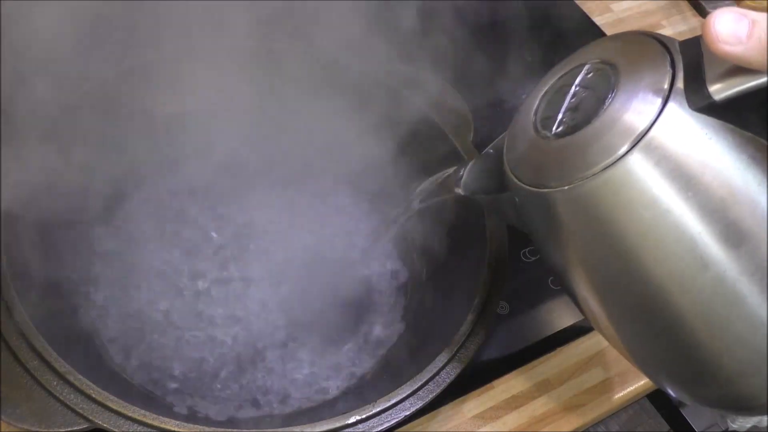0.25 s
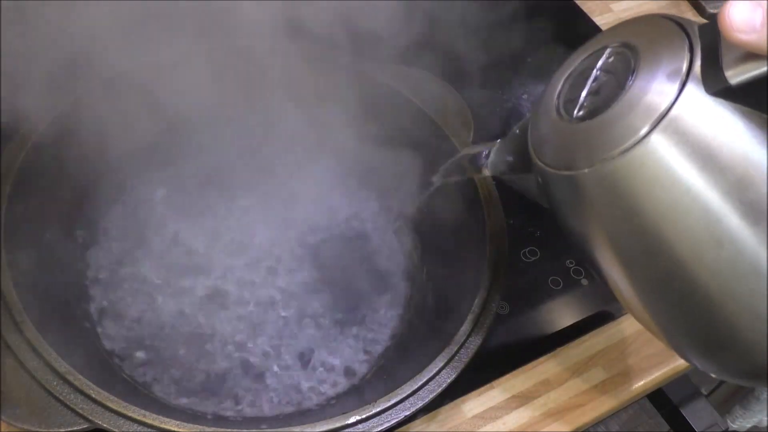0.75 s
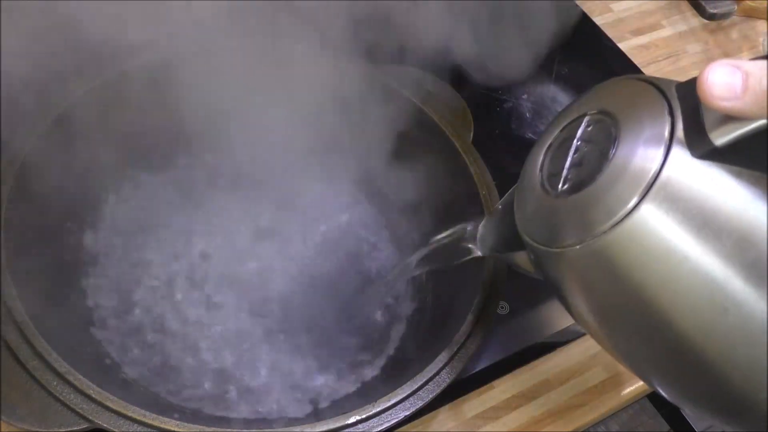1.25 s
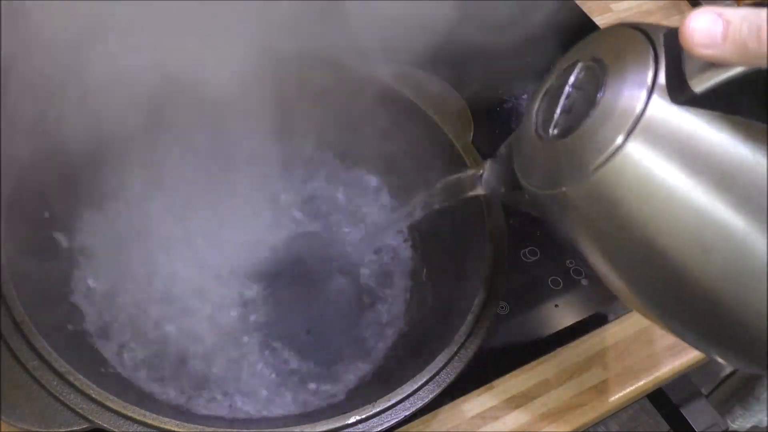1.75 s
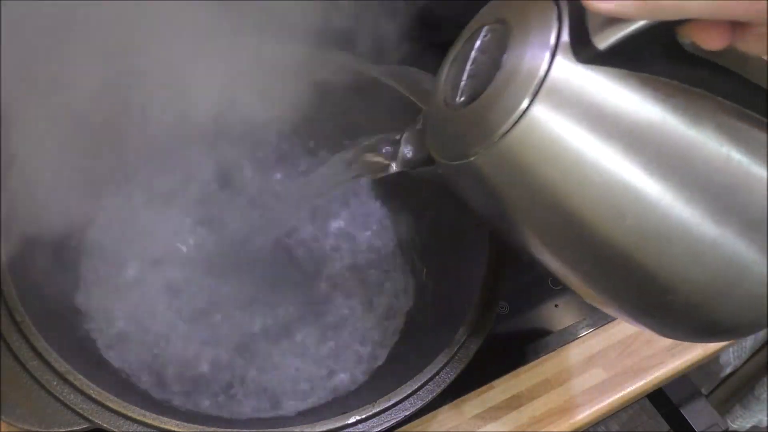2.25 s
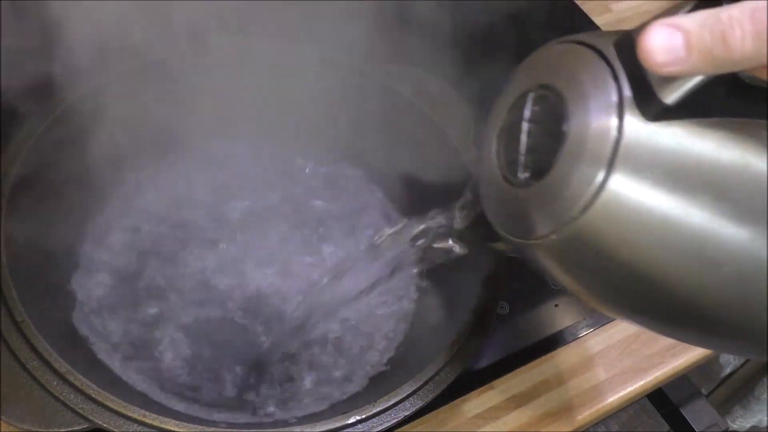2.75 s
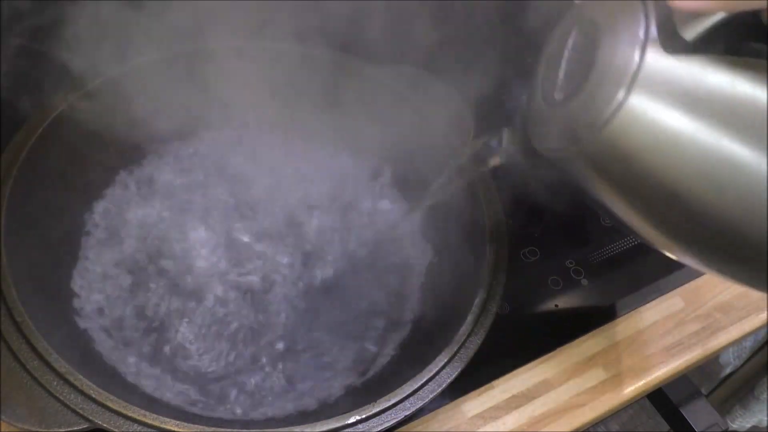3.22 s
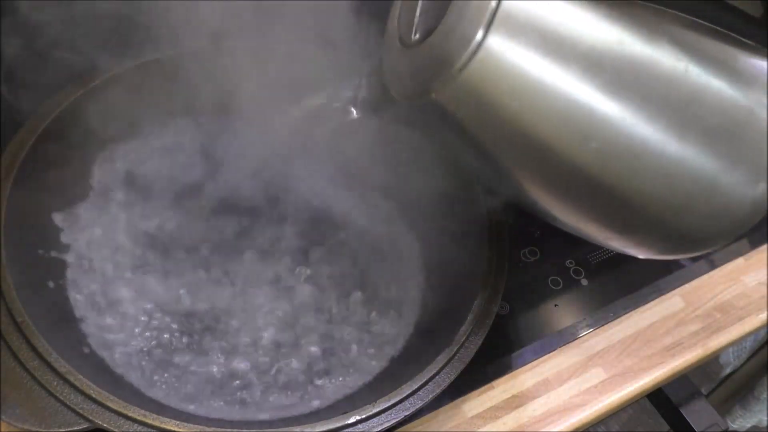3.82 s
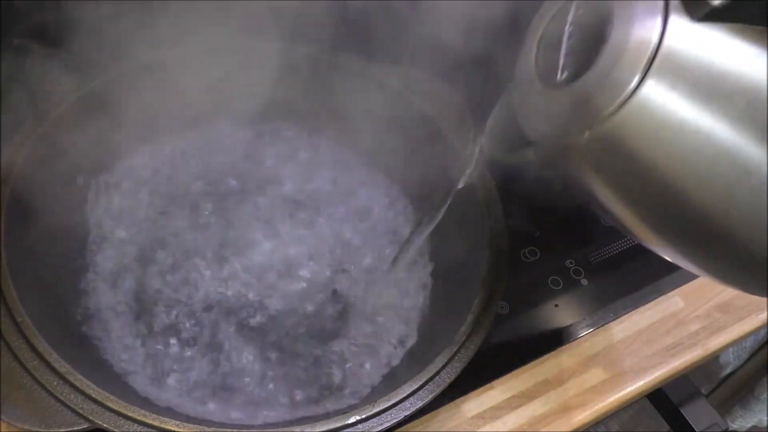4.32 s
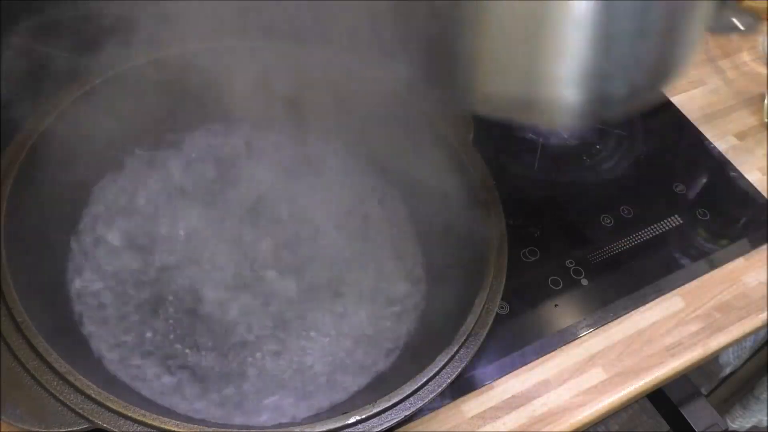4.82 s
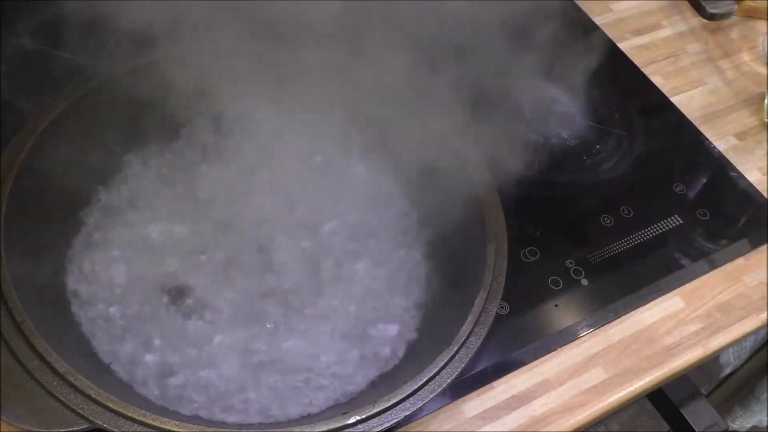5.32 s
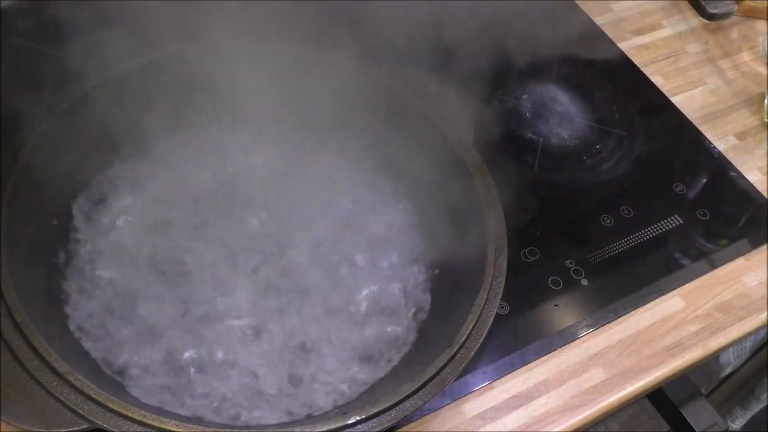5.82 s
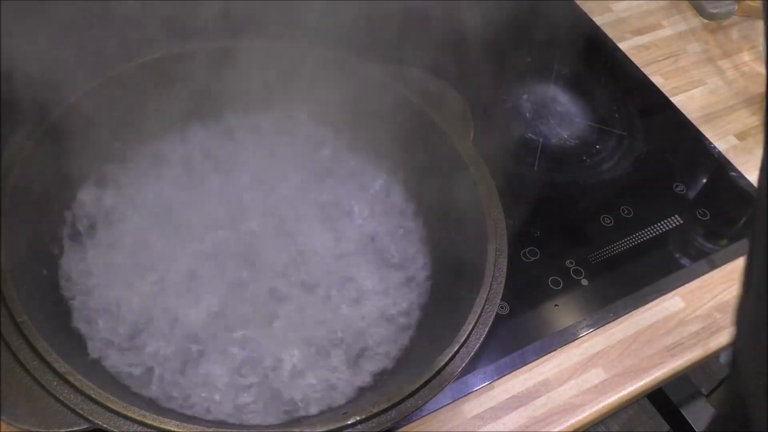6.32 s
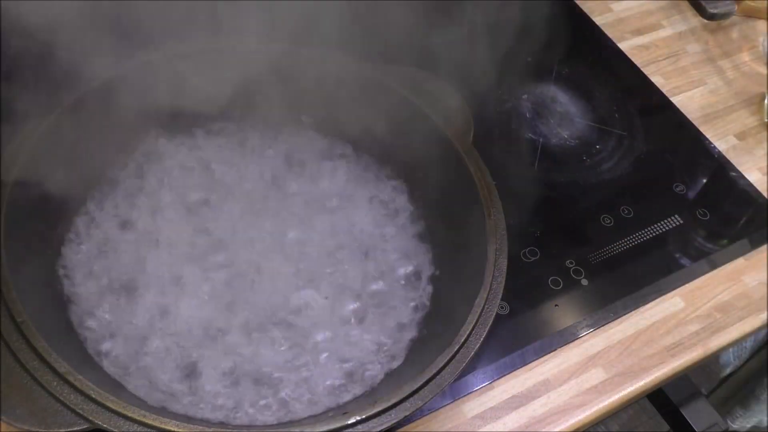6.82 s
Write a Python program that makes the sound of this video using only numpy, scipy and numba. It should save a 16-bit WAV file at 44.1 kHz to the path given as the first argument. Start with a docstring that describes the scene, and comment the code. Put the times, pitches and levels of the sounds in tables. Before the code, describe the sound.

From 0 s, water pouring into a very hot iron pan boils furiously, close to a stereo microphone in a kitchen. The sound is a dense, continuous, broadband hiss of steam, bright and somewhat thin at first, wavering slightly, with faint metallic colouring from the pan. From about 1.5 to 3 s the bubbling becomes clearer, tiny short rising blips in clumps, and the roar turns deeper and fuller as the pool fills. Small surges come around 1.8, 3 and 4 s. From 4.5 to 6 s the boil is steady, frothy and full, with a little more low rumble. At about 6.3 s the kettle is set down nearby: one knock, then a louder tight clatter at 6.38-6.45 s, dull, woody and clicky, with a short room echo. The boil drops noticeably beneath the knocks, then creeps back until the end at 7 s.

```python
"""In a kitchen, microphone near a very hot iron pan, hot water is poured in and boils hard: noise shaped per moment.
Steam hisses and bubbles burst as short rising rings, while the roar deepens with the filling pool.
Late on, the kettle is set down close by with a few knocks: dull clicks over ringing modes, with a short room echo.
Gain control ducks the boil under the knocks and lets it creep back."""
import sys
import numpy as np
from scipy import signal
from scipy.fft import rfft, irfft
from scipy.io import wavfile
from scipy.ndimage import uniform_filter1d, minimum_filter1d
from numba import njit

SR = 44100
rng = np.random.default_rng(int(sys.argv[2]) if len(sys.argv) > 2 else 0)


def master_out(mix):
    """Clip the mix to full scale and print it as 16-bit PCM to the path in sys.argv[1]."""
    frames = np.transpose(np.atleast_2d(mix))
    ceiling = np.clip(frames, -1, 1)
    pcm = np.round(ceiling * 32767).astype(np.int16)
    wavfile.write(sys.argv[1], SR, pcm)


N = 311784

# how hard the pool boils, ahead of the gain control: time_s, level_db, treble_tilt_db
BOIL_COURSE = [(0, -22.5, 1), (.15, -24, -.5), (.36, -22, -0.5), (.5, -23, .3), (.62, -23.5, -.3),
               (.72, -22.5, .6), (.95, -23.1, -1.2), (1.12, -22.5, -1.2), (1.48, -24.5, -2), (1.84, -21, 1),
               (2.05, -23.5, -1.5), (2.37, -21.9, 0), (2.68, -24, -0.5), (2.98, -20.8, -1.5),
               (3.15, -22.5, -.5), (3.68, -23.5, -0.5), (3.95, -21, -0.5), (4.27, -22, 1), (4.42, -23, 1),
               (4.7, -23.7, .2), (5.15, -23, -.2), (5.5, -22.5, 0.5), (5.65, -24, -0.7), (5.85, -22.6, 0),
               (6.6, -23, 0), (7.07, -22.5, 2)]
# depth of the pool, rising while pouring and again as it froths up: time_s, depth (0-1)
POOL_DEPTH = [(0, .05), (1.3, .2), (2.6, .62), (4.3, 0.49), (6, .97), (7.07, 0.92)]
# low rumble over its usual share: time_s, lift_db
RUMBLE_LIFT = [(0, .3), (2, -1), (2.6, -2.5), (4.8, 2.5), (6.1, -1), (6.6, 5), (7.07, -1)]
# colour of a thin film of water: pitch_hz, density_db (per Hz, relative)
SHALLOW_COLOUR = [(18, -70), (30, -39), (134, -19.5), (266, -27.5), (311, -15.5), (364, -32.5), (394, -19),
                  (584, -10), (684, -16.5), (740, -13), (1350, -4.5), (2830, -3), (11700, -7.5),
                  (16000, -15.5)]
# colour of a full pool: pitch_hz, density_db (per Hz, relative)
DEEP_COLOUR = [(18, -63), (30, -26), (149, -12), (259, -18), (303, -9.5), (426, -2.5), (780, -7.5),
               (1250, -5.5), (1350, -6), (2350, -4.5), (5590, -7), (9460, -7), (13700, -9.5),
               (16000, -19.5)]
# the iron and the air over it ring with the boil: pitch_hz, width_hz, lift_db
PAN_RINGS = [(50, 13, 2), (77.5, 30, -7), (103, 14, -1.5), (188, 30, 0.5), (211, 16, -5.5), (286, 17, -4.5),
             (314, 30, 5.5), (378, 20, -2), (439, 21, 4), (503, 14, 2.5), (608, 38, 4.5), (674, 24, -2),
             (732.4, 17, 7.5), (743, 10, 0), (789, 16, 6), (820, 12, -5), (850, 21, 4.5), (1082, 29, 2),
             (1289, 42, 4), (1334, 25, -2), (1428, 33, 3), (1660, 47, -3.5), (1805, 55, 0),
             (2870, 180, 1.5), (4950, 220, 0), (5700, 560, -1), (9330, 330, 1.5)]
# likeness of the boil's two channels: pitch_hz, likeness (0-1)
STEREO_LIKENESS = [(60, 0.76), (130, 0.85), (210, .7), (330, 0.86), (640, 0.93), (1200, 0.95), (1800, .91),
                   (3100, 0.91), (4800, .95), (6200, 1), (15000, 1)]
# level balance of the boil's channels: pitch_hz, left_minus_right_db
STEREO_LEAN = [(60, 1), (110, 5), (200, 1.5), (380, -1.5), (700, -0.5), (1290, -0.5), (2380, 1.0),
               (4400, 0.5), (6200, 0), (15000, 0)]
# phase by which the boil's left channel leads: pitch_hz, lead_rad
STEREO_LEAD = [(0, 0), (260, -0.38), (860, 0.0), (1380, 0.16), (2760, 0.08), (6200, 0), (16100, 0)]
# bursting bubbles: time_s, level_db
BUBBLE_LEVEL = [(0, -44), (.8, -41.5), (1.8, -33), (2.8, -32), (3.7, -35.3), (4.6, -36), (5.2, -33.5),
                (6, -40.5), (7.07, -37)]
# kettle base on the worktop: start_s, blow_db, most_struck_hz, click_db, click_top_hz, left_minus_right_db
KETTLE_KNOCKS = [(6.3002, 1, 330, -8, 2590, 3), (6.380, 4.5, 270, -6.5, 3000, 2),
                 (6.3992, 4, 684, -2, 3700, 4), (6.429, 0, 200, -9, 3500, 1),
                 (6.437, -4, 180, -20, 3000, 4), (6.449, -6.5, 330, -28, 2000, 1)]
# modes of worktop and kettle before each blow's small shift: pitch_hz, level_db, t60_s
WORKTOP_MODES = [(126, -8.5, 0.12), (180, -9, .1), (280, 0, 0.058), (330, -1, 0.068), (401, -0.5, 0.061),
                 (532, -2.5, 0.042), (685, -1.5, 0.044), (900, -9, .02), (1218, 1, 0.037), (1810, 1, 0.02)]
EDGE_HZ = 15950  # upper band limit
SIDES = np.array([[1], [-1]])  # left, right


def gain_of(db):
    """Decibels to an amplitude factor."""
    return 10 ** (np.asarray(db) / 20)


def evened(x):
    """Scales to rms 1."""
    return x / np.sqrt(np.mean(x ** 2) + 1e-20)


def read(points, hz):
    """Reads a spectrum table at the given frequencies, on a log pitch scale."""
    f, value = np.transpose(points)
    return np.interp(np.log(hz + 1), np.log(f + 1), value)


def follow(rows, t):
    """Reads the columns of a time table at the given times."""
    s, *columns = np.transpose(rows)
    return [np.interp(t, s, column) for column in columns]


def drift(t, low_hz, high_hz):
    """Slow chance of rms 1: sines of random phase, the slower ones stronger."""
    rates_hz = np.geomspace(low_hz, high_hz, num=30)
    return evened(sum(np.sin(2 * np.pi * (f * t + rng.random())) / np.sqrt(f) for f in rates_hz))


def boil_colour(t, hz):
    """Spectrum at each moment: the roar sinks as the pool deepens, while treble and rumble waver."""
    depth = np.clip(follow(POOL_DEPTH, t)[0], -.3, 1.3)
    colour_db = read(SHALLOW_COLOUR, hz)[:, None] * (1 - depth) + read(DEEP_COLOUR, hz)[:, None] * depth
    # treble against mids wavers by moment
    treble_tilt = np.clip(np.log2(hz / 4500 + 1e-3), -.5, .5)[:, None]
    colour_db += follow(BOIL_COURSE, t)[1] * treble_tilt
    colour_db += follow(RUMBLE_LIFT, t)[0] / (1 + (hz / 330) ** 4)[:, None]
    colour = gain_of(colour_db)
    return colour / np.sqrt((colour ** 2).mean(0))


def boil(patch_db=0.61, surge_db=0.3):
    """Countless tiny steam bursts merge to noise, coloured by the pool's depth and the pan."""
    frames, hz = N // 512 + 5, np.fft.rfftfreq(2048, 1 / SR)
    colour = boil_colour(np.arange(frames) * 512 / SR, hz)
    a, b, c, d, patches, surges = rng.standard_normal((frames, 1025, 6)).T

    patches = uniform_filter1d(patches, size=24, axis=0)
    patches = evened(uniform_filter1d(patches, size=6, axis=1))
    surges = uniform_filter1d(surges, size=300, axis=0)
    surges = evened(uniform_filter1d(surges, size=8, axis=1))  # wide bands swell together
    flicker = gain_of(patch_db * patches + surge_db * surges)

    same = np.clip(read(STEREO_LIKENESS, hz), -1, 1)[:, None]
    left = a + 1j * b
    right = same * left + np.sqrt(1 - same ** 2) * (c + 1j * d)
    # half of each level and phase difference goes to either side
    half_lean = gain_of(read(STEREO_LEAN, hz) / 2)
    balance = (half_lean * np.exp(.5j * read(STEREO_LEAD, hz)))[:, None]
    spectra = np.array([left * balance, right / balance]) * colour * flicker

    roar = signal.istft(spectra, nperseg=2048, noverlap=1536)[1][:, :N]
    t = np.arange(0, N + 64, 64) / SR
    level_db = follow(BOIL_COURSE, t)[0] + 0.31 * drift(t, 4., 30.)
    return evened(pan(roar)) * gain_of(np.interp(np.arange(N) / SR, t, level_db))


def pan(x, ripple_db=1.1):
    """Narrow lifts and dips where the iron and the air above it ring; nearby surfaces ripple the treble."""
    hz = np.fft.rfftfreq(N, 1 / SR)
    rings_db = sum(db / (1 + (2 * (hz - f) / width) ** 2) for f, width, db in PAN_RINGS)
    ripple = uniform_filter1d(rng.standard_normal(len(hz)), size=300)
    ripple = evened(uniform_filter1d(ripple, size=300))  # about 40 Hz wide
    treble = np.clip(hz / 1500 - 1, 0, 1)
    return irfft(rfft(x) * gain_of(rings_db + ripple_db * ripple * treble), N)


def bubbles(per_s=900., low_hz=1046.0, high_hz=1750.0, cycles=12.6, spread_db=2.0, tilt_db=2.0):
    """Steam pockets burst at the surface: short rising rings of many sizes; tilt_db is per octave."""
    bursts = rng.random(N) < per_s / SR
    strength = gain_of(spread_db * np.minimum(rng.exponential(1, N), 5)) * bursts
    kind = rng.integers(0, 24, N)
    t, out = np.arange(2000) / SR, np.zeros((2, N))
    for k, hz in enumerate(np.geomspace(low_hz, high_hz, num=24)):
        turns = hz * t
        rising = np.sin(2 * np.pi * turns * (1 + 0.0019 * turns))
        ring = rising * (1 - np.exp(-turns)) * np.exp(-3 * turns / cycles)
        ring *= gain_of(tilt_db * np.log2(hz / low_hz))
        pops = signal.oaconvolve(strength * (kind == k), ring)[:N]
        out += pops * gain_of(1.8 * rng.uniform(-0.96, 1) * SIDES)  # each size has its spot in the pan
    t = np.arange(0, N + 256, 256) / SR
    level_db = follow(BUBBLE_LEVEL, t)[0] + 1.24 * drift(t, 2.5, 25.)  # they come in clumps
    return evened(pan(out)) * gain_of(np.interp(np.arange(N) / SR, t, level_db))


def knocks(click_low_hz=900., click_s=0.0071, reach_db=-6.0):
    """Each blow is a dull click and the same modes ringing, weaker by reach_db per octave; deep ones swell slowly."""
    out, t = np.zeros((2, N + 8000)), np.arange(8000) / SR
    hz, mode_db, t60 = np.transpose(WORKTOP_MODES)[:, :, None]
    chatter = rng.standard_normal((len(KETTLE_KNOCKS), 8000))
    # each blow's modes sit a little higher or lower, at random
    detune = rng.uniform(0.934, 1.03, (len(KETTLE_KNOCKS), len(WORKTOP_MODES), 1))
    for row, noise, shift in zip(KETTLE_KNOCKS, chatter, detune):
        start_s, blow_db, struck_hz, click_db, top_hz, lean_db = row
        swell = (1 - np.exp(-t * hz / 0.96)) ** 2
        share_db = mode_db + reach_db * abs(np.log2(hz / struck_hz))
        modes = gain_of(share_db - 60 * t / t60) * swell * np.sin(2 * np.pi * hz * shift * t)
        band = signal.butter(3, [click_low_hz, top_hz], "band", fs=SR, output="sos")
        click = evened(signal.sosfilt(band, noise))
        click *= (1 - np.exp(-t / 0.00058)) * np.exp(-t / click_s)
        blow = gain_of(blow_db) * modes.sum(0) + gain_of(click_db) * click
        at = round(start_s * SR)
        out[:, at:at + 8000] += blow * gain_of(lean_db / 2 * SIDES)
    return out[:, :N]


def kitchen(x, t60=0.16, wet_db=-12.0):
    """Room echo: sparse taps of random sign, other ones for each side, dying away."""
    taps = np.zeros((2, 16000))
    at = np.arange(160, 15960, 20) + rng.integers(0, 20, (2, 790))
    np.put_along_axis(taps, at, rng.choice([-1., 1.], at.shape), 1)
    taps *= gain_of(-60 * np.arange(16000) / SR / t60)
    taps = signal.lfilter([.4], [1, -.6], taps)  # walls soak up treble
    taps /= np.linalg.norm(taps[0])
    return gain_of(wet_db) * signal.fftconvolve(x, taps, axes=1)[:, :N]


def scene():
    """The pan in front, the kettle set down nearby with its echo in the room."""
    kettle = knocks()
    return boil() + bubbles() + kettle + kitchen(kettle)


@njit
def chase(over_db, fall, recover):
    """Gain control's memory: follows a rise at one speed and lets go at another."""
    out, now = np.zeros(len(over_db)), 0.
    for i in range(len(over_db)):
        now += (fall if over_db[i] > now else recover) * (over_db[i] - now)
        out[i] = now
    return out


def record(dry):
    """The microphone drops deep bass; slow gain control, then a limiter, duck all at loud peaks; then band limit."""
    bass_cut = signal.butter(2, 45., "high", fs=SR, output="sos")
    heard = signal.sosfilt(bass_cut, dry)
    power = uniform_filter1d((heard ** 2).mean(0), size=400)
    power_db = 10 * np.log10(abs(power) + 1e-12)
    over_db = np.maximum(np.roll(power_db, -70) + 20.0, 0)  # above -20 dB, looking a little ahead
    over_db = -minimum_filter1d(-over_db, size=801, origin=400)  # holds each peak for 18 ms
    # time constants in s: fall, then recovery
    slow_db = 0.68 * chase(over_db, 1 / (0.02 * SR), 1 / (.9 * SR))
    left_over_db = np.maximum(over_db - 0.52 * slow_db, 0)  # the slow stage eases the limiter
    quick_db = 1.03 * chase(left_over_db, 1 / (.0035 * SR), 1 / (.045 * SR))
    ducked = heard / gain_of(quick_db + slow_db)
    band_limit = signal.firwin(511, EDGE_HZ, window=("kaiser", 9), fs=SR)
    return signal.oaconvolve(ducked, band_limit[None], "same")


dry = scene()
out = record(dry)
master_out(out)
```